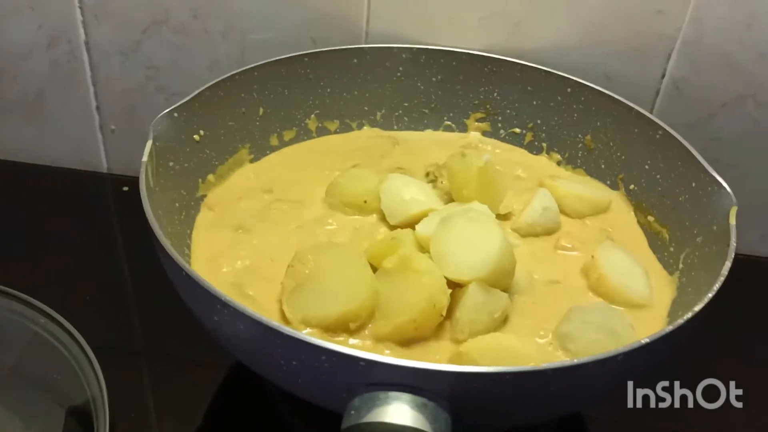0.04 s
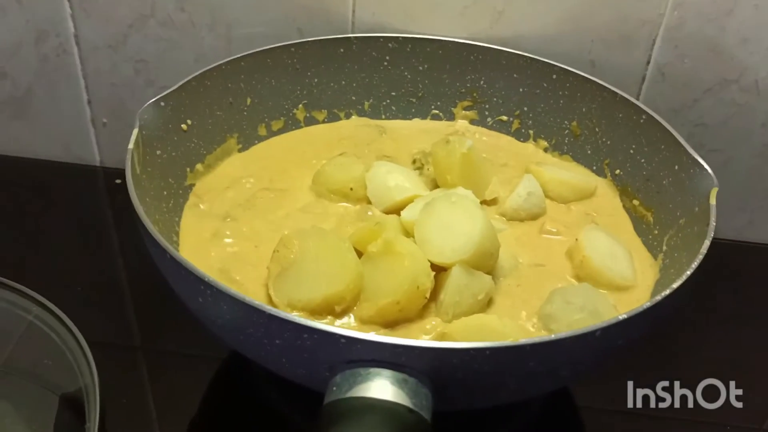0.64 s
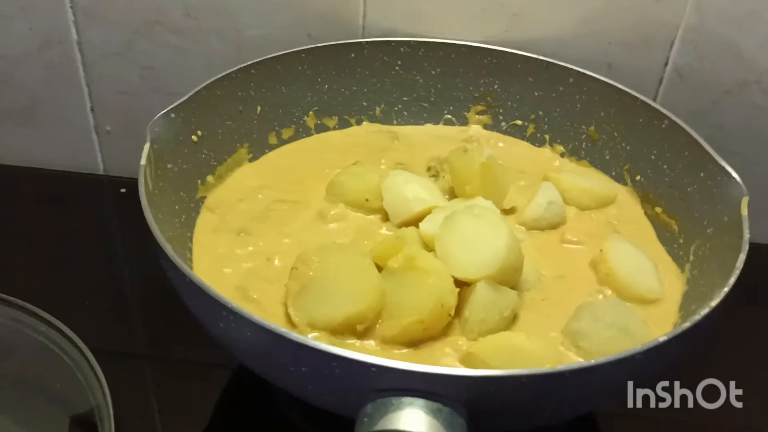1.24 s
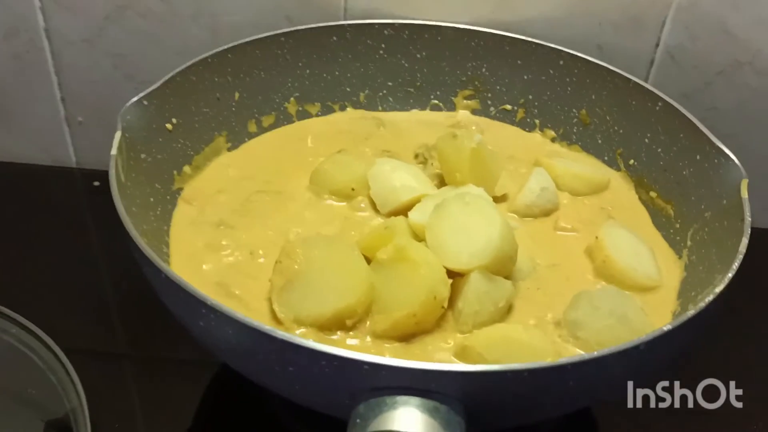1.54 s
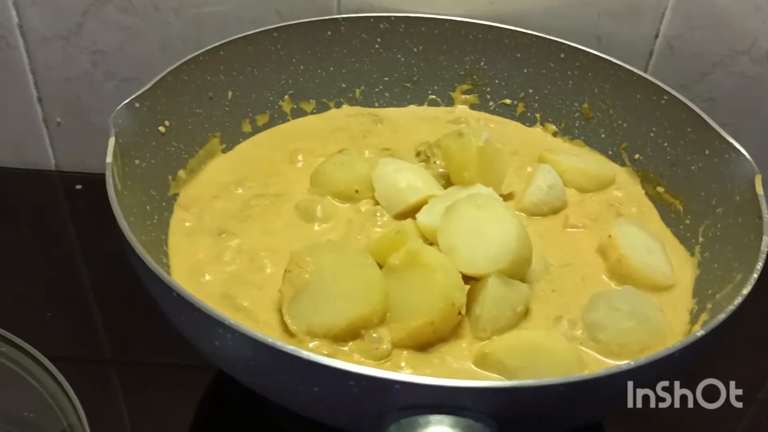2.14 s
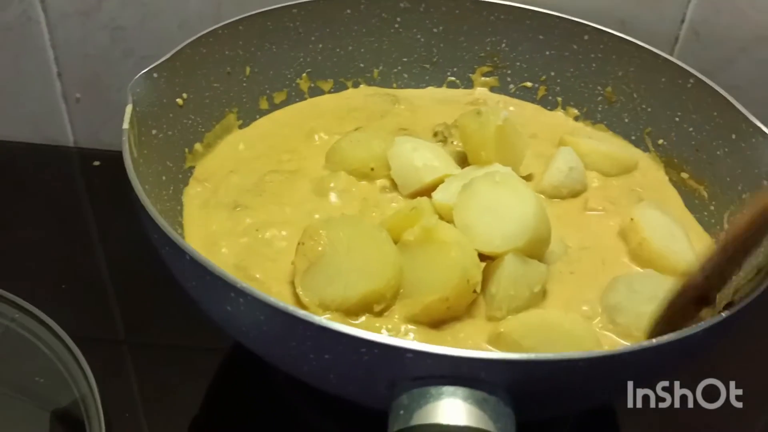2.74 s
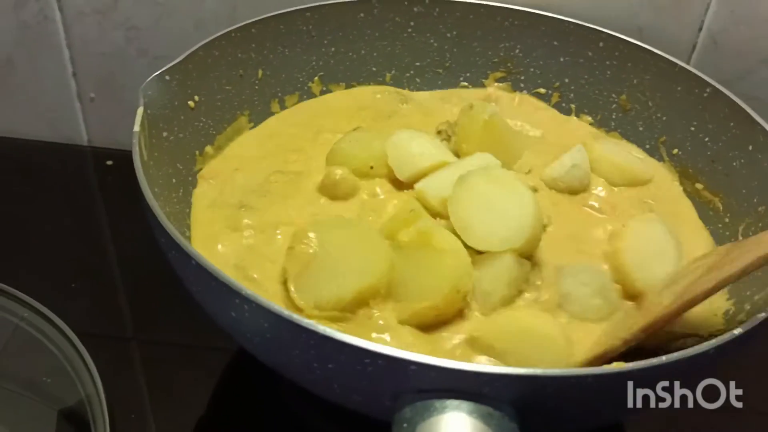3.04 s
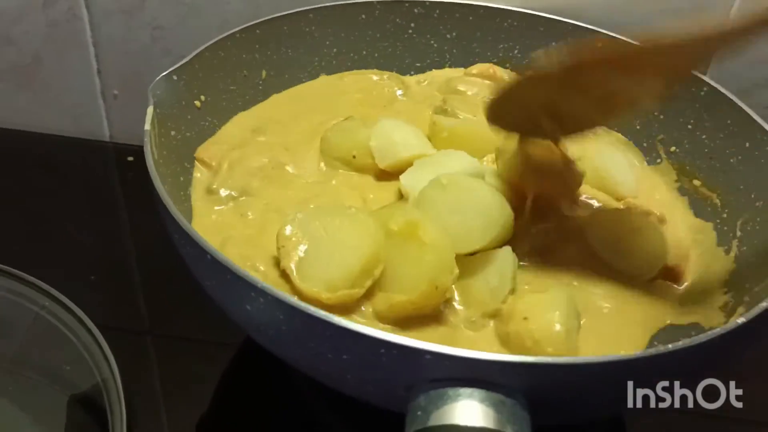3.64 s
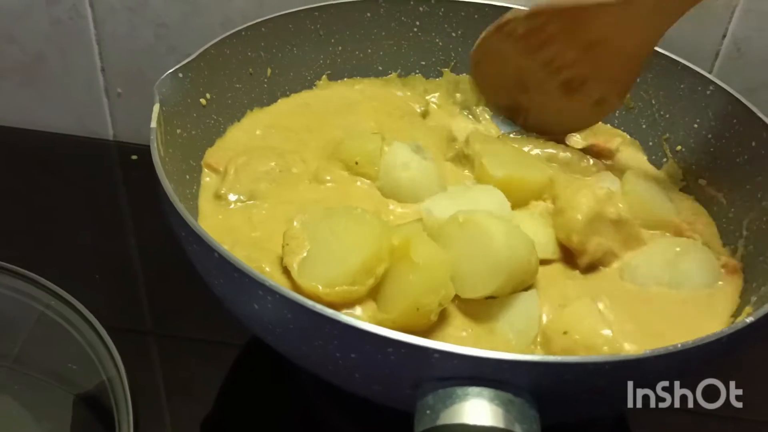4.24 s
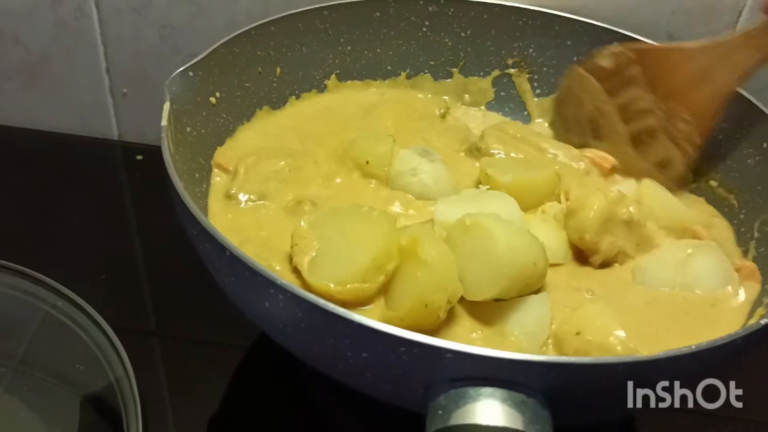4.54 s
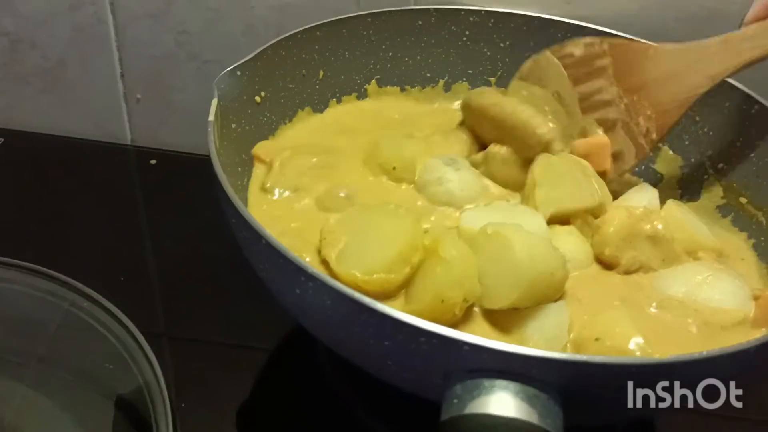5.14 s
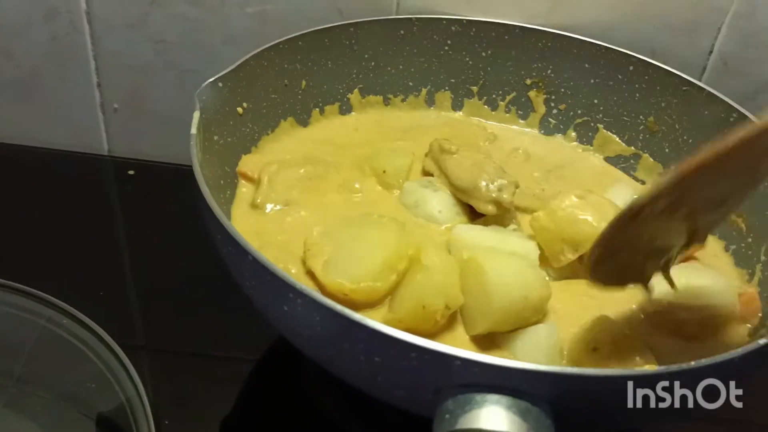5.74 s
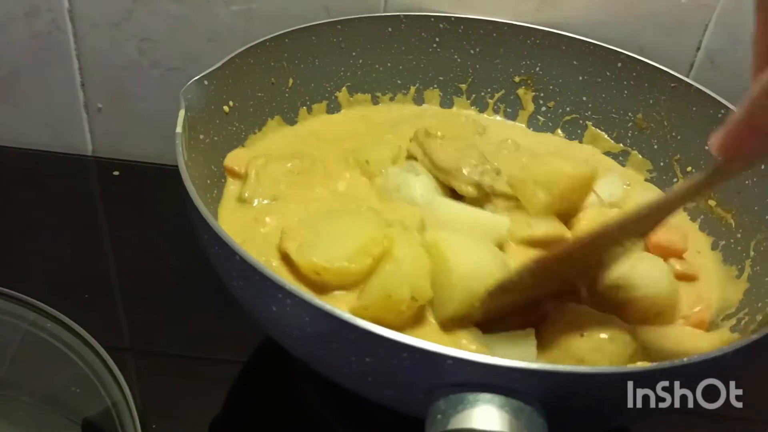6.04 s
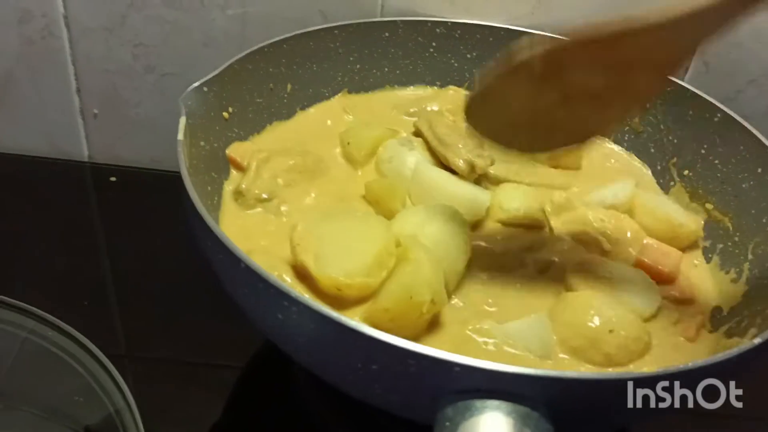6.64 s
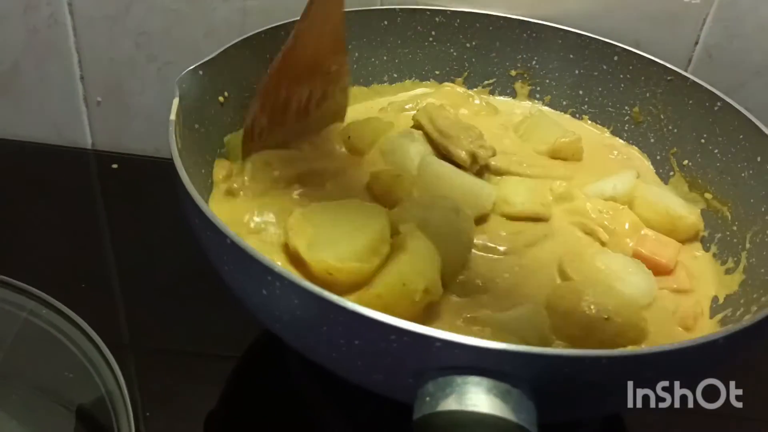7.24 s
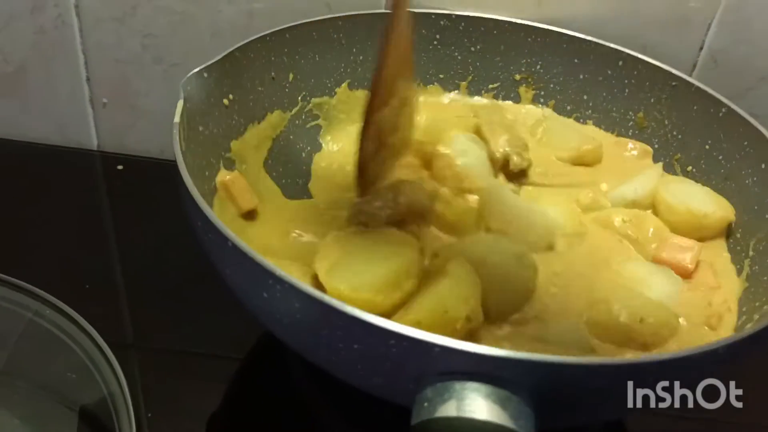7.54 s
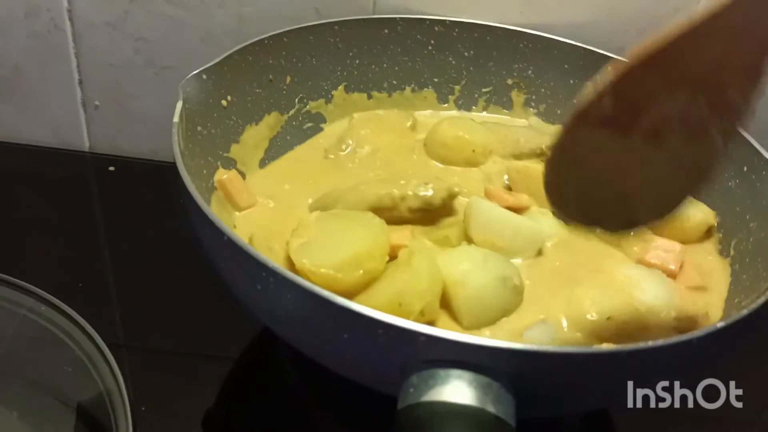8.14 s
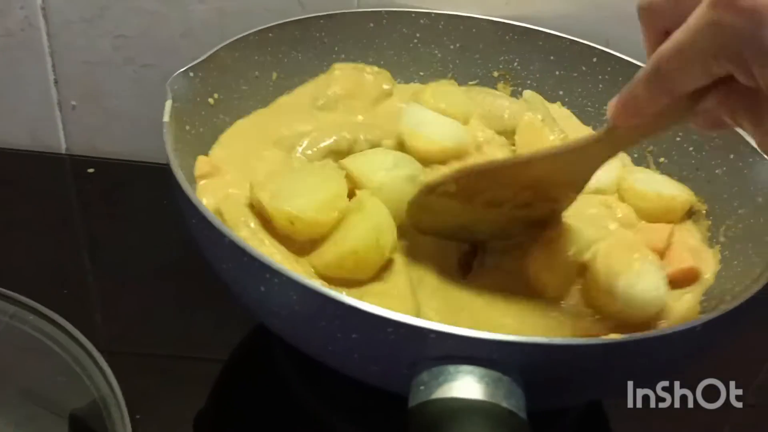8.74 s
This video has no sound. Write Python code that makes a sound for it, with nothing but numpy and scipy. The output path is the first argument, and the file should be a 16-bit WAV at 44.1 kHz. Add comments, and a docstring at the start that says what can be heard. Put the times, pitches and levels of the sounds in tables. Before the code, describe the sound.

Sharp knocks on a worktop, then a wooden spatula squelching and tapping through gently simmering curry, over a low fan drone.

```python
"""Thick potato curry simmers in a non-stick pan: the rim fizzes, bubbles plop and pockets of sauce spit.
Behind it a fan drones in a small tiled kitchen, and a faint hum comes and goes. Early on, knocks ring
the worktop and a utensil scrapes over steel. Then a wooden spatula squelches through the sauce, taps
the pan and nudges it into a judder on the glass hob. Now and then air puffs against the microphone."""
import sys
import numpy as np
from scipy import signal
from scipy.fft import rfft, irfft, next_fast_len
from scipy.io import wavfile

SR = 44100
rng = np.random.default_rng(int(sys.argv[2]) if len(sys.argv) > 2 else 0)


def materialize(psi):
    """Save the field psi as 16-bit PCM at rate SR to the path in sys.argv[1].

    A 1-D psi becomes a single channel; in a 2-D psi each row is a channel.
    """
    bounded = np.clip(np.atleast_2d(psi).T, -1, 1)
    quanta = np.round(bounded * 32767).astype(np.int16)
    wavfile.write(sys.argv[1], SR, quanta)


N = 388080

# stereo image of the noise layers: (frequency [Hz], left-right correlation [-1 to 1])
STEREO_LIKENESS = [(40, 1), (150, 0.95), (400, 0.86), (700, 0.07), (1300, 0.0094), (5500, -0.092),
                   (8000, 1), (15000, 0.75)]
# tail of the tiled room: (frequency [Hz], t60 [s])
KITCHEN_T60 = [(100, 0.55), (500, 0.46), (2000, 0.46), (6000, 0.33), (15000, 0.26)]
# air on the left microphone: (time [s], length [s], level [dB])
PUFFS = [(2.287, 0.034, -43), (2.47, 0.042, -49), (5.187, 0.11, -37.5), (5.622, 0.055, -51),
         (8.16, .04, -55)]
# swells of the faint hum: (time [s], length [s], level [dB])
HUMS = [(4.111, 0.23, -46), (4.952, 0.23, -49)]
# hits on the worktop: (time [s], body [dB], thud [dB], crack [dB], rise time [s])
KNOCKS = [(.5820, -17.5, -24, -24.5, 0.0013), (.6455, -22.5, -27, -32, 0.0038),
          (.7950, -34, -40, -62, 0.00039), (.8150, -29, -63, -31.5, 0.0023),
          (.8300, -25.5, -61, -60, 0.0045), (.8525, -20, -28, -19.5, 0.00086)]
# the pan shifts on the hob: (time [s], length [s], rumble [dB], rasp [dB], relative boom [dB])
NUDGES = [(5.171, 0.14, -42, -50, -44), (5.288, 0.057, -35, -51, -47), (5.342, 0.11, -43, -54, -66),
          (6.544, 0.072, -29, -41.5, -37), (6.623, 0.048, -33.5, -47.5, -53),
          (6.659, 0.059, -43.5, -56, -52), (6.753, 0.11, -30, -40, -47), (7.971, 0.1, -49, -43, -48)]
# spatula hits on the pan: (time [s], body [dB], thud [dB], crack [dB])
TAPS = [(3.095, -54, -45.5, -73), (3.130, -50, -56, -50), (3.226, -49, -56, -62),
        (3.353, -43.5, -48, -33.5), (3.385, -47.5, -49, -61), (3.471, -58, -55, -47),
        (4.0302, -32.5, -52, -59), (4.467, -41.5, -62, -46), (4.565, -49, -44.5, -73),
        (4.755, -43, -74, -51), (4.883, -46.5, -55, -48), (5.232, -62, -53, -45), (6.117, -61, -53, -69),
        (6.398, -53, -77, -46.5), (6.996, -43.5, -46, -53), (8.395, -46.5, -48, -64)]
# spatula pushes through the sauce: (time [s], length [s], relative level [dB])
STROKES = [(2.7, .06, -43.5), (2.86, 0.41, -48), (3.48, 0.3, -48.5), (4.85, 0.49, -51.5),
           (6.184, 0.057, -47.5), (7.326, 0.15, -56), (8.68, .1, -53)]
# wet smacks of the sauce: (time [s], relative level [dB], centre [Hz], t60 [s])
SPITS = [(1.162, -42, 8900, .12), (1.359, -44, 6700, .087), (2.418, -40, 4400, 0.12),
         (2.723, -46, 1990, .23), (2.915, -45, 4300, 0.057), (3.099, -43, 1080, 0.082),
         (3.295, -34.5, 1140, .052), (3.359, -39, 3330, 0.11), (3.519, -44, 2800, 0.093),
         (3.601, -42, 3170, .12), (4.89, -42.5, 5100, .14), (5.226, -39.5, 2600, 0.28),
         (6.194, -42.5, 5600, 0.14), (6.21, -38.5, 3330, 0.037), (6.301, -40.5, 2380, 0.11),
         (6.325, -41.5, 9300, 0.096), (6.397, -45, 1900, 0.11), (6.504, -45, 3360, .12),
         (7.034, -47, 7300, .06), (7.07, -49, 3330, .079), (7.342, -47, 8300, .04), (7.469, -47, 5130, .12),
         (7.868, -43, 4750, 0.11), (8.008, -43, 4570, 0.14), (8.096, -44.5, 7550, .072),
         (8.621, -41, 12100, .16)]

# resonances: (frequency [Hz], relative level [dB], t60 [s])
WORKTOP_MODES = [(130.4, -4, 0.33), (149.4, -12.5, 0.26), (245, -5, 0.032), (401, -8, 0.054),
                 (510, 0, 0.12), (592, -11, .06), (619, -3.5, 0.068), (756, -6.5, 0.13), (829, 0.5, 0.075),
                 (897, -6, 0.095), (1080, -13, 0.29), (1123, -16, 0.23), (1340, -17, 0.12),
                 (1446, -19, .12), (1776, -20, 0.14), (2080, -15.5, 0.16), (3340, -14.5, 0.11),
                 (3650, -21, 0.2), (4200, -17, 0.16), (4400, -23, 0.24), (5040, -19, 0.17), (5233, -28, .2),
                 (5733, -18, 0.12), (6130, -28, 0.13), (6700, -33, .18), (7650, -19, 0.29), (8860, -7, 0.1)]   # the knocked panel
STEEL_MODES = [(3530, 0, 0.14), (4096, -10, 0.13), (4300, 4, 0.078), (4375, 1.5, 0.24), (4750, -1, 0.054),
               (5500, -1, 0.13), (6700, -2, 0.15), (6600, -9, .13), (6760, 4, .1), (7860, 0, 0.061),
               (8260, 1.5, 0.16), (8350, -7, 0.23), (9360, -1, 0.062), (10700, -5, .05), (11400, 3, 0.058),
               (11400, -15, 0.14), (12600, -7, .04), (13500, -4, .04), (14000, -3, .05), (15000, -8, .06)]   # thin, bright steel
PAN_MODES = [(200, -8.5, 0.044), (330, 5.5, 0.036), (496, 2, 0.076), (640, -5, 0.055), (750, -9, .04),
             (860, -5.5, 0.018), (1080, -2.5, .04), (1230, -2, 0.015), (1740, -18.5, 0.17),
             (2050, -3, 0.054), (2385, 2.5, 0.024), (2660, -9, 0.083), (2990, -4.5, 0.076),
             (3450, -11, 0.11), (3990, -18.5, 0.1), (5300, -22, 0.039), (6560, -9.5, 0.055)]   # the pan, damped by the sauce
HOLLOW_MODES = [(1030, -8, 0.028), (2260, -4.5, 0.019), (3200, -12, 0.0097), (4325, 0, 0.018),
                (5630, 3, .012), (7300, -2, 0.009)]   # the air between sauce and pan wall

# tone curves of the noises: (frequency [Hz], relative spectral density [dB])
FAN_EQ = [(20, -8), (35, 7.5), (52, -13.5), (80, -4.5), (125, -1), (165, -1.5), (200, 1), (240, -14.5),
          (295, 2), (345, -2), (410, 1), (520, -4), (720, -18), (1800, -25)]   # low drone
KNOCK_EQ = [(40, -28), (90, -18), (150, 0.5), (500, 6), (900, 6), (1500, -4), (3000, -8), (5500, -2),
            (9000, -14), (12000, -16.5), (16000, -28)]   # rattle of a hit on the worktop
SCRAPE_EQ = [(50, -21), (200, -5.5), (2000, -5.5), (3200, -3), (4500, 5), (8000, -3.5), (10000, -9),
             (11300, 2), (12500, -3), (15500, -6.5)]   # grit on steel
JUDDER_EQ = [(30, -19), (80, -2), (130, -12), (200, 3), (260, -4.5), (420, 0.5), (620, -6.5), (850, -20),
             (1600, -42), (4000, -53)]   # pan slipping on glass
WOOD_EQ = [(100, -27), (400, 6), (1000, 5), (1700, -5.5), (2400, -6.5), (4000, -3.5), (7000, -12),
           (15000, -41)]   # clack of the spatula
SQUELCH_EQ = [(200, 1), (450, -4), (1100, -5), (1700, -5.5), (3100, -3), (5000, -3), (12000, -20)]   # sticky sauce tearing
CRACKLE_EQ = [(800, -1), (2000, -2), (3200, 0.5), (7500, 1), (10000, -6), (15500, -11)]   # droplets frying off
SIZZLE_EQ = [(500, -4.5), (1050, -1.5), (1750, -5), (2300, 4.5), (2700, 0.5), (3100, 1.5), (3750, -3.5),
             (5000, -1), (6300, -2.5), (7300, -5), (8800, -5.5), (10000, -10), (15500, -12)]   # fizz at the rim

CUTOFF_HZ = 15650
PUFF_ATTACK_S, PUFF_T60_S, PUFF_LOW_HZ, PUFF_TOP_HZ = 0.023, 0.32, 22, 100
FAN_DB, FAN_WANDER_DB = -48, 1.33
HUM_HZ, HUM_SAG_HZ_PER_S, HUM_ATTACK_S, HUM_T60_S = 475, 20, 0.037, 0.29
SCRAPE_AT_S, SCRAPE_LENGTH_S, BITE_AFTER_S = 1.815, .061, .019
BITE_DB, LANDING_DB, EASE_DB_PER_S = -19.7, -5.5, 192   # the landing is relative to the bite
SMALL_SPITS_PER_S, SMALL_SPIT_LOW_HZ, SMALL_SPIT_HIGH_HZ, SPIT_ATTACK_S = 1.3, 4500, 8000, 0.0028
SIZZLE_DB, SIZZLE_SAG_DB_PER_S, SIZZLE_WANDER_DB = -46.5, 0.28, 0.23   # the simmer slowly calms


def amp(db):
    """Decibels to gain."""
    return 10 ** (np.asarray(db) / 20)


def rms_one(x):
    """Scale to unit rms."""
    return x / np.sqrt(np.mean(x ** 2) + 1e-20)


def at_hz(points, hz):
    """Read a curve on a log-frequency axis."""
    f, value = np.transpose(points)
    return np.interp(np.log(np.maximum(hz, 1)), np.log(f), value)


def cut(x, hz, kind, order=2):
    """Butterworth filter."""
    sos = signal.butter(order, np.clip(hz, 10, SR / 2 - 1000), kind, fs=SR, output="sos")
    return signal.sosfilt(sos, x)


def add(out, s, sound):
    """Mix a sound in at time s."""
    i = round(s * SR)
    out[:, i:i + sound.shape[-1]] += sound[..., :N - i]


def balance(db):
    """Left and right gains for a left-minus-right level."""
    return amp([[db / 2], [-db / 2]])


def swell(s, length, attack, t60):
    """An envelope that rises from time s, holds to the end of its length and dies away."""
    t = np.arange(N) / SR - s
    return np.clip(t / attack, 0, 1) * amp(-60 * np.maximum(t - length, 0) / t60)


def drift(per_s):
    """A modulator that glides between random values of spread 1."""
    knots = rng.standard_normal(2000)
    return np.interp(np.arange(N) / SR * per_s, np.arange(len(knots)), knots)


def coloured(x, eq):
    """Two unrelated signals act as mid and side of a stereo sound with this tone curve; rms 1."""
    size = next_fast_len(x.shape[-1])
    hz = np.arange(size // 2 + 1) * SR / size
    mid, side = rfft(x, size) * amp(at_hz(eq, hz))
    alike = np.clip(at_hz(STEREO_LIKENESS, hz), -.99, .99)
    stereo = np.sqrt(1 + alike) * mid + np.sqrt(1 - alike) * side * [[1], [-1]]
    return rms_one(irfft(stereo, size)[:, :x.shape[-1]])


def noise(eq, size):
    """Smooth stereo noise."""
    return coloured(rng.standard_normal((2, size)), eq)


def clicks(per_s, spread_db, size):
    """Random clicks, many small and a few large."""
    heights = amp(spread_db * np.minimum(rng.exponential(1, size), 4.5))
    return (rng.random(size) < per_s / SR) * heights * rng.choice([-1, 1], size)


def click_pair(per_s, spreads_db, size):
    """Two unrelated click streams, each with its own spread of levels."""
    return np.array([clicks(per_s, spread_db, size) for spread_db in spreads_db])


def ring(x, hz, t60):
    """A resonator: a unit click sets off a dying sine."""
    r, w = amp(-60 / (t60 * SR)), 2 * np.pi * hz / SR
    return signal.lfilter([0, np.sin(w)], [1, -2 * r * np.cos(w), r * r], x + 1e-18)


def kitchen(x):
    """Diffuse reflections from the tiles; each octave dies at its own pace."""
    t = np.arange(SR // 2) / SR
    air, tail = noise([(20, 0), (20000, 0)], len(t)), 0
    for hz in 88 * 2. ** np.arange(8):
        octave = cut(air, [hz / np.sqrt(2), hz * np.sqrt(2)], "band")
        tail = tail + octave * amp(-60 * t / at_hz(KITCHEN_T60, hz))
    tail = rms_one(tail * np.clip(t / 0.0081, 0, 1)) / np.sqrt(len(t))
    return signal.fftconvolve(x, tail, axes=1)[:, :N]


def shadowed(x, corner_hz=10000, depth=0.41):
    """The right microphone faces away and gets less of the highest treble."""
    left, right = x
    hz = np.arange(N // 2 + 1) * SR / N
    loss = depth / (1 + (corner_hz / np.maximum(hz, 1)) ** 10)
    return np.array([left, irfft(rfft(right) * (1 - loss), N)])


def fan():
    """The bed: a low drone of moving air whose level wanders slightly."""
    return noise(FAN_EQ, N) * amp(FAN_DB + FAN_WANDER_DB * drift(7.3))


def hum():
    """A soft wavering tone whose pitch sags a little each time it sounds."""
    out, t = 0, np.arange(N) / SR
    for s, length, db in HUMS:
        hz = HUM_HZ - HUM_SAG_HZ_PER_S * (t - s) + 3 * drift(30)
        envelope = swell(s, length, HUM_ATTACK_S, HUM_T60_S) * amp(db + 1.3 * drift(11))
        out = out + envelope * np.sin(2 * np.pi * np.cumsum(hz) / SR)
    return out


def puffs():
    """Air brushes the left microphone: short swells of low turbulence."""
    flow = sum(amp(db) * swell(s, length, PUFF_ATTACK_S, PUFF_T60_S) for s, length, db in PUFFS)
    rumble = rms_one(cut(cut(rng.standard_normal(N), PUFF_TOP_HZ, "low"), PUFF_LOW_HZ, "high"))
    return np.array([flow * rumble, np.zeros(N)])


def impacts(rows, modes, eq, rattle_db, rattle_t60, thud_hz, crack_hz, vary_db):
    """Each hit layers a dry snap, a dense rattle and clear modes; the contact weights bass and treble."""
    out, t = np.zeros((2, N)), np.arange(SR // 2) / SR
    hz, mode_db, t60 = np.transpose(modes)[:, :, None]
    snap, rattle = amp(3 - 60 * t / 0.024), amp(rattle_db - 60 * t / rattle_t60)
    phase = 2 * np.pi * hz * t
    for s, body_db, thud_db, crack_db, rise in rows:
        decays = amp(mode_db + vary_db * rng.standard_normal(hz.shape) - 60 * t / t60)
        # high modes reach the two sides out of step
        skew = rng.standard_normal(hz.shape) * np.minimum(hz / 2500, 1)
        tone = np.array([np.sum(decays * np.sin(phase + side * skew), axis=0) for side in (1, -1)])
        hit = (tone + noise(eq, len(t)) * (snap + rattle)) * (1 - np.exp(-t / rise))
        thud = cut(hit, thud_hz, "low")
        body = -cut(hit, [thud_hz, crack_hz], "band")
        crack = cut(hit, crack_hz, "high")
        for band, db in (thud, thud_db), (body, body_db), (crack, crack_db):
            add(out, s, amp(db) * band / np.std(band[:, :SR // 40]))   # level of the first 25 ms
    return out


def worktop_knocks():
    """Knocks ring the worktop panel, which radiates little below its lowest mode."""
    hits = impacts(KNOCKS, WORKTOP_MODES, KNOCK_EQ, rattle_db=4, rattle_t60=0.083,
                   thud_hz=330, crack_hz=2200, vary_db=1)
    return cut(hits, 114, "high", order=3)


def utensil_scrape():
    """A utensil lands lightly, bites and eases off: dense tiny slips set thin steel ringing."""
    since_bite = np.arange(N) / SR - SCRAPE_AT_S - BITE_AFTER_S
    ease_db = -EASE_DB_PER_S * np.clip(since_bite, 0, SCRAPE_LENGTH_S - BITE_AFTER_S)
    grip_db = BITE_DB + np.where(since_bite < 0, LANDING_DB, ease_db)
    force = amp(grip_db) * swell(SCRAPE_AT_S, SCRAPE_LENGTH_S, attack=.012, t60=.12)
    slips = click_pair(5000, (2.3, 2.6), N)
    grit = force * coloured(slips, SCRAPE_EQ) * amp(1.2 * drift(200))
    steel = sum(amp(db) * rms_one(ring(grit, hz, t60)) for hz, db, t60 in STEEL_MODES)
    return amp(-0.5) * grit + amp(-2.5) * np.std(grit) * rms_one(steel)


def pan_nudges():
    """The pan sticks and slips on the glass: a low judder with a thin rasp, and the hob booms under it."""
    out, t = np.zeros((2, N)), np.arange(SR // 4) / SR
    for s, length, rumble_db, rasp_db, boom_db in NUDGES:
        push = np.interp(t / length, [0, .14, .6, 1.2], [0, 0.88, 0.76, 0.009])
        slips = click_pair(900, (3.2, 3.4), len(t))
        rumble = amp(rumble_db) * coloured(slips, JUDDER_EQ)
        rasp = amp(rasp_db) * rms_one(cut(noise(SIZZLE_EQ, len(t)), 3600, "low"))
        boom = amp(boom_db - 2.5) * rms_one(cut(slips[0], [35, 170], "band"))
        add(out, s, push * (rumble + rasp + boom))
    return out


def spatula_taps(rise_s=0.00056):
    """Wood clacks on the pan, and the sauce chokes the ring."""
    return impacts([(*tap, rise_s) for tap in TAPS], PAN_MODES, WOOD_EQ, rattle_db=-8, rattle_t60=0.12,
                   thud_hz=269, crack_hz=1900, vary_db=2.5)


def bubbles(per_s, low_hz, high_hz, cycles, spread_db, sizes=14):
    """Bursting bubbles of many sizes and like energy, each size at its own place in the pan; rms 1."""
    bursts, size_of, out = clicks(per_s, spread_db, N), rng.integers(0, sizes, N), np.zeros((2, N))
    for size, hz in enumerate(np.geomspace(low_hz, high_hz, sizes)):
        pop = np.sqrt(hz) * ring(bursts * (size_of == size), hz, cycles / hz)
        out += [pop, np.roll(pop, rng.integers(-6, 7))]
    return rms_one(out)


def stirring():
    """Sauce squelches around the moving blade: threads tear in a sticky rustle, small pockets close."""
    push = sum(amp(db) * swell(s, length, attack=0.04, t60=0.29) for s, length, db in STROKES)
    tears_per_s = 2500 * amp(5.4 * drift(35))
    rustle = coloured(click_pair(tears_per_s, (1.4, 2.8), N), SQUELCH_EQ)
    pockets = bubbles(800, 740, 3500, cycles=12, spread_db=1.0)
    return push * (amp(-5) * rustle + amp(-9.5) * pockets)


def small_spits(count=40, relative_db=-52, t60=.15):
    """Cues for faint spits at random times and pitches, laid out like SPITS."""
    gap, _, pitch = rng.random((count, 3)).T
    times = np.cumsum(-np.log(1 - gap)) / SMALL_SPITS_PER_S
    pitches = SMALL_SPIT_LOW_HZ * (SMALL_SPIT_HIGH_HZ / SMALL_SPIT_LOW_HZ) ** pitch
    return [(s, relative_db, hz, t60) for s, hz in zip(times, pitches) if s < N / SR]


def spits():
    """A pocket of sauce tears open: a spray of clicks rings its cavity, droplets fizz on the hot wall."""
    out, t = np.zeros((2, N)), np.arange(SR // 4) / SR
    for s, db, hz, t60 in SPITS + small_spits():
        drops = click_pair(4000, (1.5, 2.7), len(t))
        spray = rms_one(cut(drops + 0.3 * drops[::-1], [hz / np.sqrt(2), hz * np.sqrt(2)], "band"))
        sharpness = min(hz / 7000, 1)   # small pockets burst the most sharply
        fizz = coloured(drops[::-1], CRACKLE_EQ) * amp(8.5) * sharpness
        cavity = amp(-1.5) * rms_one(ring(spray, hz, 25 / hz))
        smack = (spray + fizz + cavity) * amp(-60 * t / t60) * np.clip(t / SPIT_ATTACK_S, 0, 1)
        add(out, s, amp(db - 2.5) * smack / np.std(smack[:, :SR // 60]))
    return out


def pan_walls(x, hollow_db, echo_db, echoes=6):
    """The open pan adds hollow air resonances, and its wall and the tiles send back quick echoes."""
    out = x.copy()
    for hz, db, t60 in HOLLOW_MODES:
        q = np.pi * hz * t60 / np.log(1000)
        out += amp(hollow_db + db) * signal.lfilter(*signal.iirpeak(hz, q, fs=SR), x)
    for side, lags in enumerate((rng.uniform(.0008, .009, (2, echoes)) * SR).astype(int)):
        out[side] += amp(echo_db) * sum(np.pad(out[side], (lag, 0))[:N] for lag in lags)
    return rms_one(out) * np.std(x)


def simmer(sizzle_db):
    """Fine frying at the rim, crackles in little clumps, and soft plops in the thick middle."""
    fizz = noise(SIZZLE_EQ, N) * amp(sizzle_db - 0.33 + .5 * drift(25))
    laps = np.abs(clicks(16, 3.0, N)) + 1e-18   # sauce laps the hot wall
    frying_off = signal.lfilter([1], [1, -np.exp(-1 / (.014 * SR))], laps)
    crackles_per_s = 500 * amp(5.0 * np.minimum(drift(10), 2)) + 3000 * frying_off
    crackle = coloured(click_pair(crackles_per_s, (2.8, 1.9), N), CRACKLE_EQ) * amp(sizzle_db - 6.0)
    pops = bubbles(110, 2590, 12500, cycles=35, spread_db=3.8) * amp(sizzle_db - 11.5)
    plops = bubbles(45, 315, 1285, cycles=19, spread_db=2.0) * amp(-61.5)
    return pan_walls(fizz + crackle + pops, hollow_db=-2, echo_db=-13.5) + plops


def scene():
    """The mix: simmer and spatula up close, worktop sounds and room a little left, the fan underneath."""
    sizzle_db = SIZZLE_DB - SIZZLE_SAG_DB_PER_S * np.arange(N) / SR + SIZZLE_WANDER_DB * drift(2.91)
    drone, knocks, taps = fan(), worktop_knocks(), spatula_taps()
    aside = knocks + utensil_scrape()
    near = taps + spits() + stirring() + pan_nudges()
    room = kitchen(amp(-9) * aside + amp(-8.5) * near)
    background = shadowed(aside + room) * balance(db=1.4) + puffs() + (drone + hum()) * balance(db=0.9)
    return background + near * balance(db=0.3) + simmer(sizzle_db) * balance(db=-1.1)


def record(dry):
    """Soft saturation rounds the peaks, and a steep low-pass trims the top."""
    return signal.sosfilt(signal.ellip(10, .1, 90, CUTOFF_HZ, fs=SR, output="sos"), np.tanh(dry))


dry = scene()
out = record(dry)
materialize(out)
```